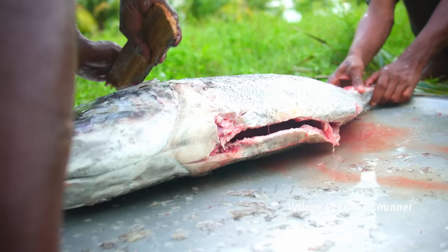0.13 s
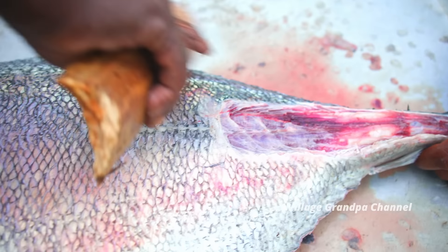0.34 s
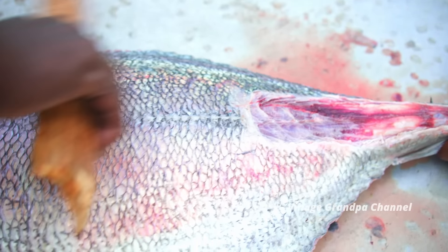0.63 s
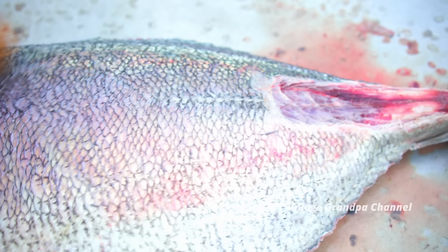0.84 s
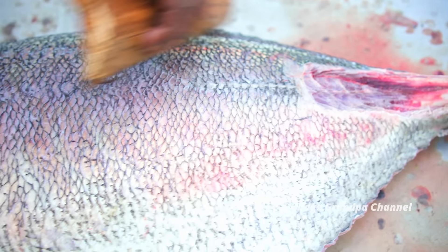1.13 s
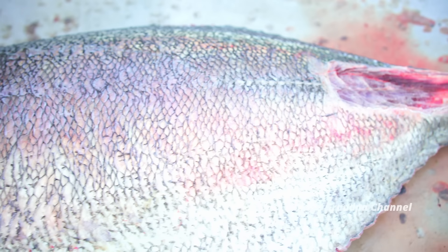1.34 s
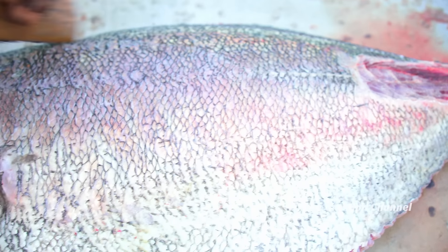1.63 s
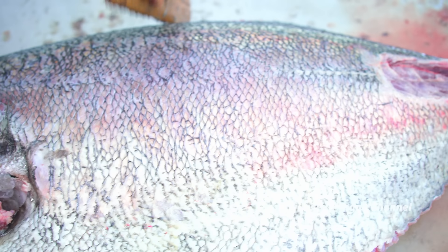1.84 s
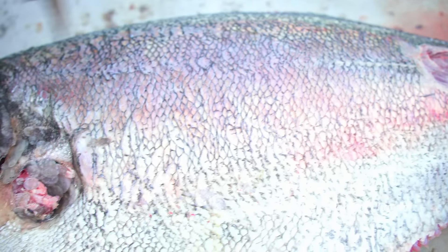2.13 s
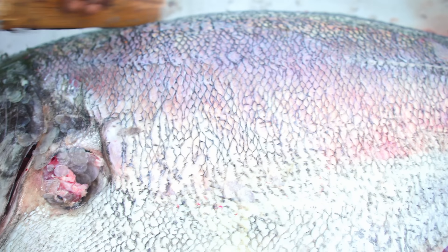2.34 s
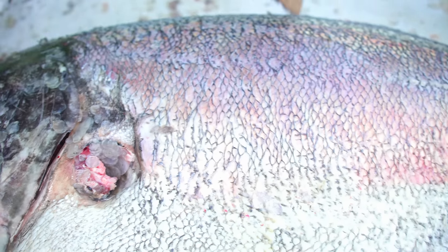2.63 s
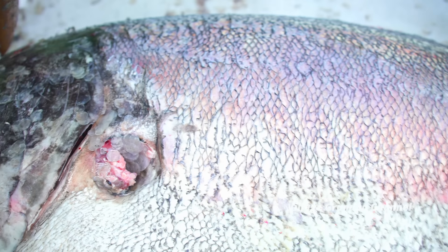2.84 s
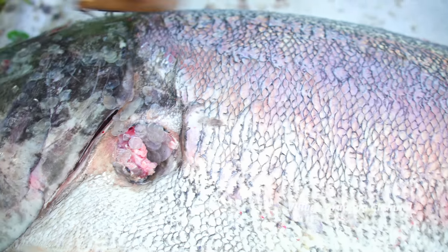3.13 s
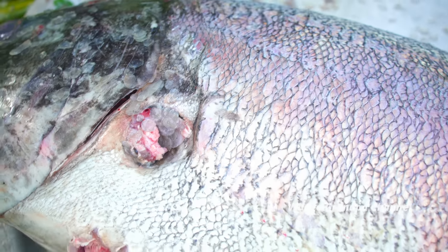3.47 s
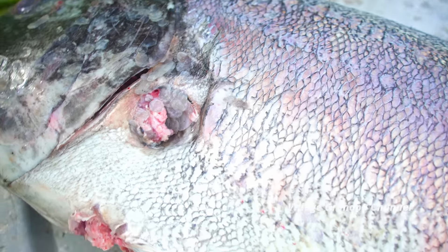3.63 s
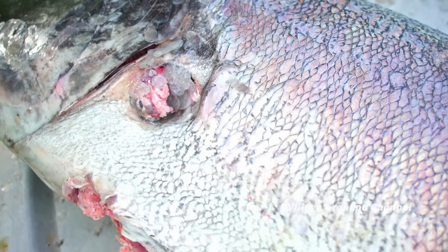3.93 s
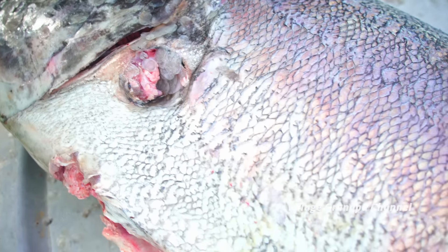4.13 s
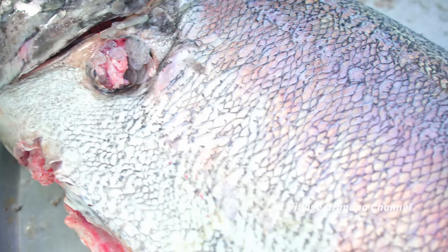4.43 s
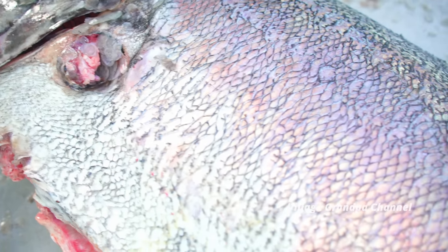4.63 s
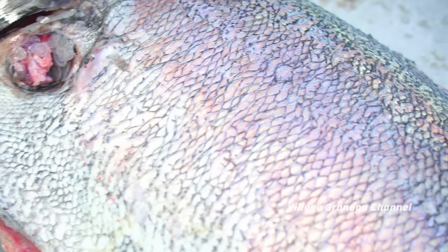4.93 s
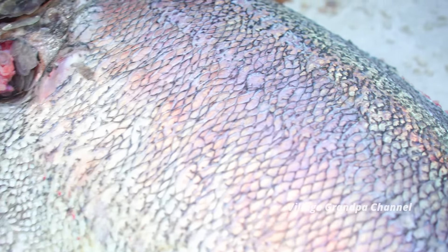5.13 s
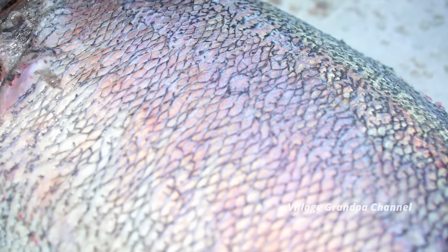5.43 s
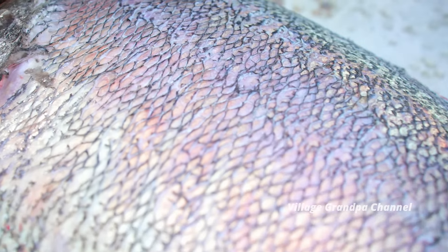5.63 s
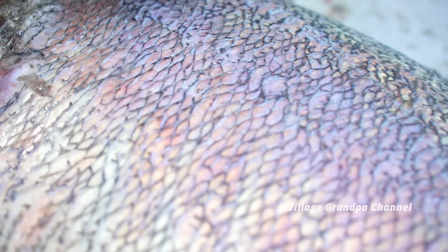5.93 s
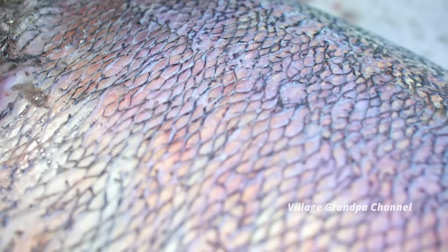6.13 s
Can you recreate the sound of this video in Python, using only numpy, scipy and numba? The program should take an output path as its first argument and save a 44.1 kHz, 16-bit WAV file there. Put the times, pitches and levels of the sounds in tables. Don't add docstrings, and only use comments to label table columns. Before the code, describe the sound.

Quick dry scrapes on a scaly fish lying on sheet metal: each is a short burst of crackle and hiss with hard snaps, a hollow fleshy knock and a slight low table hum. The opening strokes are strongest and longest, later ones shorter and lighter at a regular pace. Close, dry microphone in open air, with quiet leaves, a barely audible insect and soft wind rumble.

```python
import sys
import numpy as np
from scipy import signal
from scipy.fft import rfft, irfft
from scipy.io import wavfile
from scipy.ndimage import uniform_filter1d
from numba import njit

SR = 44100
rng = np.random.default_rng(int(sys.argv[2]) if len(sys.argv) > 2 else 0)


def wav_record(signal):
    frames = np.transpose(np.atleast_2d(signal))
    bounded = np.clip(frames, -1, 1)
    quanta = np.round(bounded * 32767).astype(np.int16)
    wavfile.write(sys.argv[1], SR, quanta)


def to_linear_factor(level_db):
    exponent = np.asarray(level_db, float) / 20
    return 10 ** exponent


N = 277609

# touch, hardest push and lift in seconds, hardest rubbing in dB, rubbing at touch in dB.
STROKES = [(0.042, 0.12, 0.192, -13.5, -15.5), (0.326, 0.38, 0.41, -25, -43.5),
           (0.44, 0.514, 0.58, -16.5, -23.5), (0.629, 0.683, 0.73, -28, -38.5),
           (0.761, 0.855, 0.93, -16, -26.5), (1.163, 1.217, 1.337, -14, -30),
           (1.575, 1.641, 1.707, -20, -40), (1.959, 1.971, 2.09, -26, -32.5),
           (2.144, 2.166, 2.178, -47.5, -53), (2.341, 2.406, 2.438, -27.5, -30.5),
           (2.734, 2.76, 2.835, -29.5, -28.5), (3.112, 3.152, 3.2, -23.5, -33.5),
           (3.46, 3.505, 3.558, -19.5, -34), (3.808, 3.859, 3.926, -21.5, -40),
           (4.192, 4.213, 4.231, -26, -32), (4.523, 4.544, 4.606, -20.5, -32.5),
           (4.87, 4.89, 4.95, -21, -40), (5.205, 5.236, 5.32, -26, -34), (5.587, 5.624, 5.69, -25, -29.5),
           (5.911, 5.981, 6.016, -19, -34), (6.281, 6.293, 6, -33.5, -42)]
# dull over bright body in dB, rubbing at lift over touch in dB,
# then flesh, scale treble and table ring above the rubbing, all in dB.
GRIPS = [(-2, -13, -5.5, -6, -13), (-2.5, -1.5, -6.5, 1, -26), (2.5, -7.5, -11.5, -11, -22.5),
         (-4.5, -6, -9.5, -5.5, -14), (3.5, -4, -6, -8.5, -13), (-1.5, -3, -13.5, -8, -23),
         (-6, -3.5, -9.5, -4, -18.5), (-4, -7.5, -9, -4, -14), (-12, -1, -7.5, -5, -7),
         (-5, -1.5, -7.5, -2.5, -14), (-2.5, -3, -8, -0.5, -17.5), (-7.5, 2, -13.5, -6.5, -13.5),
         (-7, -1.5, -15.5, -4, -13), (-7.5, -1, -12, -4, -10.5), (-4.5, -1, -10, -3, -24),
         (-10, -5, -14.5, -5.5, -34), (-4.5, 3.5, -13.5, -9, -16), (-3.5, -4.5, -8, -5, -16),
         (0.5, -1, -6.5, -5.5, -15.5), (1, 9, -7.5, -10, -26), (3.5, -1, -1.5, -11, -3)]
# time in seconds, level in dB, pitch in Hz.
PLUCKS = [(0.0542, -1.5, 2630), (0.0657, 0, 2570), (0.0856, 0, 3020), (0.101, -1, 1590), (0.105, -2, 3170),
          (0.1129, 0, 3270), (0.13, -2, 1320), (0.143, -4, 1340), (0.4788, -8, 1730), (0.5164, -4, 1870),
          (0.5297, -7.5, 1570), (0.778, -7, 1740), (0.8306, -6, 1680), (0.8586, -5, 1700),
          (0.8844, -9.5, 1520), (1.2165, -2, 1700), (1.5994, -13.5, 1800), (1.6272, -12, 1870),
          (1.6534, -11, 1940), (2.4022, -13.5, 2930), (2.4192, -10.5, 3460), (2.7473, -9, 2960),
          (2.7628, -5.5, 3220), (2.7628, -1.5, 2620), (2.7926, -9, 1860), (2.8198, -15, 2560),
          (3.4944, -5, 3630), (3.505, -11.5, 2590), (3.8433, -10.5, 3040), (3.894, -9.5, 2820),
          (4.554, -7, 2600), (4.5754, -9, 1590), (4.9097, -9, 2800), (4.9352, -15, 2690),
          (5.2356, -11.5, 1660), (5.9521, -7.5, 1387), (5.9736, -7, 1740)]


def unit(x):
    return x / np.sqrt(np.mean(x ** 2))


def walk(rate):
    hold = int(SR / rate)
    steps = np.repeat(rng.standard_normal(N // hold + 1), hold)
    return 0.85 * uniform_filter1d(steps, hold)[:N]


def ring(x, modes):
    out, power = 0, 0
    for k, (hz, width, db) in enumerate(modes):
        b, a = signal.iirpeak(hz, hz / width, SR)
        out = out + (-1) ** k * to_linear_factor(db) * signal.lfilter(b, a, x)
        power += to_linear_factor(2 * db) * np.pi * width / SR
    return out / np.sqrt(power)


@njit
def glide(x, hz, width):
    y, band, low = np.empty(len(x)), 0., 0.
    for i in range(len(x)):
        g = np.tan(np.pi * hz[i] / SR)
        k = width / hz[i]
        v = (band + g * (x[i] - low)) / (1 + g * (g + k))
        band = 2 * v - band
        low = low + 2 * g * v
        y[i] = k * v
    return y


def sliding(x, modes, shift, patchy_db=2.5):
    out, power = 0, 0
    for k, (hz, width, db) in enumerate(modes):
        gain = (-1) ** k * to_linear_factor(db + patchy_db * walk(70))
        out = out + gain * glide(x + 1e-18, hz * shift, 1. * width)
        power += to_linear_factor(2 * db) * np.pi * width / SR
    return out / np.sqrt(power)


def pings(rows, gain_db, ms, rise_ms):
    out, t = np.zeros(N + 4000), np.arange(4000) / SR
    form = (1 - np.exp(-1000 * t / rise_ms)) * np.exp(-1000 * t / ms)
    form = form / form.max()
    for s, db, hz in rows:
        out[int(s * SR):][:4000] += to_linear_factor(db + gain_db) * form * np.sin(2 * np.pi * hz * t)
    return out[:N]


def crackle(rate, spread_db, hiss):
    happens = rng.random(N) < rate / SR
    size = to_linear_factor(spread_db * np.minimum(rng.exponential(size=N), 4))
    sign = np.where(rng.random(N) < .5, -1, 1)
    return unit(unit(happens * size * sign) + hiss * rng.standard_normal(N))


def scraping():
    # time in seconds, flesh pitch in Hz, block pitch in Hz.
    contact = [
        [(0.045, 1050, 1410), (0.117, 1074, 1630), (0.185, 1080, 1500)],
        [(0.33, 656, 1830), (0.374, 670, 2100), (0.41, 747, 1810)],
        [(0.44, 1080, 1730), (0.526, 1010, 1700), (0.58, 748, 1740)],
        [(0.625, 813, 1810), (0.663, 911, 1900), (0.72, 890, 2010)],
        [(0.76, 1120, 1710), (0.906, 820, 1730), (0.94, 844, 1765)],
        [(1.165, 940, 1740), (1.223, 892, 1703), (1.33, 993, 1990)],
        [(1.55, 810, 1780), (1.66, 907, 1740), (1.7, 870, 1860)],
        [(1.94, 779, 1910), (2.042, 913, 1600), (2.09, 865, 2050)],
        [(2.34, 850, 1850), (2.39, 850, 1610), (2.46, 850, 1980)],
        [(2.72, 670, 2010), (2.812, 770, 1760), (2.845, 734, 2060)],
        [(3.11, 826, 1890), (3.148, 1020, 1910), (3.2, 944, 1850)],
        [(3.455, 665, 2000), (3.505, 702, 1924), (3.555, 727, 2006)],
        [(3.805, 665, 1810), (3.895, 705, 1780), (3.92, 709, 1830)],
        [(4.17, 860, 1730), (4.234, 760, 1680), (4.28, 885, 1850)],
        [(4.52, 689, 1886), (4.562, 672, 1820), (4.6, 780, 1700)],
        [(4.87, 684, 1745), (4.928, 677, 1780), (4.99, 763, 1860)],
        [(5.2, 970, 1820), (5.254, 816, 1570), (5.325, 635, 1870)],
        [(5.58, 765, 1770), (5.656, 930, 1780), (5.69, 902, 1783)],
        [(5.92, 990, 1685), (5.992, 1041, 1591), (6.06, 844, 1650)],
    ]
    t = np.arange(N) / SR
    starts = [row[0] - .07 for row in STROKES]
    stroke = np.clip(np.searchsorted(starts, t) - 1, 0, None)
    dull_db, _, flesh_db, treble_db, table_db = np.transpose(GRIPS)[:, stroke]
    place = np.vstack(contact).T
    flesh_hz = np.interp(t, place[0], place[1])
    block_hz = np.interp(t, place[0], place[2])

    (body_slips, treble_slips), (body_kicks, treble_kicks) = slipping()
    rub = rubbing() * to_linear_factor(2.0 * walk(230) + 2.0)
    effort = rub + body_slips
    grit = crackle(rate=1800, spread_db=4.0, hiss=.6)
    weight = signal.lfilter([.003], [1, -.997], effort)

    body = block_and_coat(grit, effort, body_kicks, dull_db, block_hz)
    treble = scale_treble(rub * to_linear_factor(treble_db) + to_linear_factor(3.5) * treble_slips, treble_kicks)
    flesh = fish_flesh(grit, effort, body_kicks, flesh_db, flesh_hz)
    tones = plucks_and_thuds()
    return body + treble - flesh + tones + metal_table(weight, body_kicks, table_db) + fish_rocking(weight)


def rubbing():
    # touch and lift in seconds, rubbing in dB.
    drags = [(.001, 0.042, -40), (0.188, 0.295, -34), (0.311, 0.33, -51), (0.592, 0.624, -55),
             (0.717, 0.748, -52), (0.934, 0.948, -42), (1.156, 1.122, -44), (1.702, 1.715, -48.5),
             (1.92, 1.95, -46), (2.092, 2.106, -55), (2.314, 2.374, -57.5), (2.435, 2.473, -42.5),
             (2.687, 2.703, -46.5), (2.713, 2.735, -53), (2.831, 2.856, -34.5), (1.556, 1.608, -55),
             (2.914, 2.943, -55.5), (3.934, 3.949, -40), (4.138, 4.141, -56), (4.154, 4.194, -45.5),
             (4.23, 4.285, -52), (4.272, 4.289, -38), (4.957, 4.972, -54), (4.97, 4.993, -42.5),
             (5.325, 5.346, -56), (5.361, 5.397, -59), (5.557, 5.577, -38.5), (5.701, 5.706, -57),
             (6.016, 6.027, -44.5), (6.032, 6.06, -31)]
    # time in seconds,
    # rubbing lost in dB, half length in ms.
    skips = [(5.577, 25, 4.2), (4.587, 16.5, 2.6), (.303, 30, 5), (.79, 1, 3.6), (2.78, 16, 2.8),
             (2.734, 11.5, 2), (1.584, 13.5, 3.1), (1.595, 15, 2.2), (1.613, 14, 2.9), (1.989, 24, 4.6),
             (2.01, 13, 2.3), (2.377, 17.5, 3.8), (2.388, 12, 3.4), (2.37, 12.5, 2.2), (2.744, 20, 3.8),
             (2.789, 10.5, 1.4), (3.121, 14, 3.1), (3.19, 14, 3), (3.468, 15, 3), (3.477, 9, 1.6),
             (3.502, 8, 1.3), (3.515, 6.5, 1.5), (3.536, 10.5, 2.5), (3.822, 16, 3.5), (3.877, 14, 4.4),
             (3.907, 21, 5.1), (3.929, 19, 3), (4.213, 8, 2.5), (4.567, 22, 4), (4.896, 21, 2.7),
             (4.926, 14, 3.1), (5.254, 14, 4.3), (5.609, 7, 3.85), (6.062, 18.5, 4)]
    touch_slope, lift_slope = 4500, 3500
    t = np.arange(N) / SR
    pushes = [(a, top, b, db, touch, touch + grip[1])
              for (a, top, b, db, touch), grip in zip(STROKES, GRIPS)]
    pushes += [(a, (a + b) / 2, b, db + 2, db - 4.5, db - 4.0) for a, b, db in drags]
    gain = 0
    for a, top, b, db, touch, lift in pushes:
        times = [a - 1, a, top, b, b + 1]
        levels = [touch - touch_slope, touch, db, lift, lift - lift_slope]
        gain = gain + to_linear_factor(np.interp(t, times, levels))
    lost_db = sum(db * np.exp(-((1000 * (t - s) / ms) ** 2) ** 1.6) for s, db, ms in skips)
    return to_linear_factor(-lost_db) * gain


def slipping():
    # time in seconds, level in dB, treble above level in dB, length in ms.
    slips = [(0.8089, -20, -24.5, 6.1), (0.8634, -14, -19, 2.5), (2.352, -17.5, -5, 6.2),
             (1.21, -17.5, -19, 10.97), (1.2346, -20, -1.5, 9), (1.569, -18, -3, 5.1),
             (1.625, -17.5, -4, 6.6), (1.9753, -20.5, -17.5, 4), (1.995, -19.5, -0.5, 9.4),
             (2.018, -30, 0, 13), (2.3467, -15, -2.5, 4.7), (2.361, -16.5, -6, 3.4),
             (2.7242, -20, -8.5, 5.5), (2.7353, -16, -15, 3.1), (2.758, -19, -6, 10.3),
             (2.793, -22.5, -15, 7.6), (2.804, -22.5, -2, 16.8), (3.178, -24, -3.5, 7),
             (3.194, -25, -2, 6.9), (3.457, -21.5, -6.5, 4.5), (3.54, -30, 2, 6.7),
             (3.837, -19.5, -5.5, 9.8), (3.8845, -22.5, -2, 9.7), (4.1996, -27, 8, 10.8),
             (4.5492, -18.5, -1, 5.9), (4.575, -18.5, -9, 7.2), (4.9342, -21, -4.5, 10.4),
             (5.258, -18.5, -24, 5.1), (5.2867, -26.5, -3.5, 13.5), (5.9944, -19, -7, 7.8),
             (6.0315, -21.5, -7.5, 3.8)]
    # time in seconds, level in dB, length in ms.
    brushes = [(0.9742, -45, 3.5), (0.985, -44.5, 8.4), (1.323, -44, 3.5), (1.334, -30.5, 5.6),
               (1.548, -28.5, 4.9), (1.7622, -50, 8.9), (1.886, -44, 11), (1.942, -38, 13),
               (2.0426, -30.5, 8.9), (2.2815, -44, 11.3), (2.6899, -29, 7.9), (2.9335, -55, 8.7),
               (3.1054, -39, 12), (3.2434, -52, 11), (3.4392, -36.5, 3.7), (3.7913, -45, 5.8),
               (3.8055, -28, 6.4), (4.0923, -41, 5.7), (4.103, -40, 9), (4.269, -24.5, 9.4),
               (4.3526, -46, 11.7), (4.4971, -35.5, 7.3), (4.592, -29, 5.1), (4.971, -24.5, 11),
               (5.154, -43.5, 13), (5.582, -21.5, 7.2), (6.21, -58, 4.3), (6.247, -57, 6.7)]
    # time in seconds, level in dB, treble above level in dB.
    snaps = [(0.0449, -16.5, -15), (0.0709, -10, -19), (0.1606, -12.5, 6.5), (0.4645, -11.5, -4.5),
             (0.5034, -12.5, -27.5), (0.7951, -12.5, -5), (1.1846, -9, -24), (1.5764, -11.5, -4.5),
             (1.9671, -12.5, -5.5), (2.3381, -23, -8.5), (2.3601, -18, -19), (2.3717, -12.5, 1.5),
             (2.3823, -9.5, -8), (2.7368, -13.5, -14), (2.7539, -14, -6.5), (2.7844, -14, -2),
             (3.1479, -17, -3.5), (3.4572, -12.5, -8), (3.4877, -12, 0), (3.5222, -19, -1.5),
             (3.8292, -13.5, -3), (3.8586, -13, -5), (4.219, -19.5, 5), (4.542, -13.5, -3),
             (4.8907, -14, -2.5), (5.2186, -15, -21), (5.2654, -18.5, 0.5), (5.2892, -23, -15.5),
             (5.5824, -18, -7), (5.603, -11, -20),
             (0.426, -34.5, -1), (0.4435, -23, -3), (0.6233, -32, -3), (.6384, -34.5, -4.5),
             (1.163, -24.5, -29), (1.3376, -33, 3), (1.5498, -29, -10), (1.5896, -20, 0.5),
             (1.6086, -25, -2), (1.9429, -21, -26), (2.1155, -56, 9), (2.2136, -49.5, -6),
             (2.7742, -23, 8.5), (5.694, -45.5, 8), (2.268, -51.5, -7), (2.4584, -36.5, 11.5),
             (2.5195, -47.5, 5), (2.6901, -27, -6.5), (2.8437, -29, 5.5), (3.105, -32.5, 1.5),
             (3.2518, -42.5, 4), (3.2906, -49.5, -2), (3.439, -30.5, 4), (3.793, -39, -6), (3.933, -31, 1),
             (4.1101, -34, 0.5), (4.142, -44, -3), (4.5223, -20.5, -4), (4.86, -35, -9), (5.202, -35, -15),
             (5.3973, -48, 4.5), (5.9227, -29.5, 9.5), (6.0461, -25.5, 0)]
    # time in seconds, level in dB.
    flakes = [(0.2302, -40), (.357, -23.5), (1.3585, -44.5), (2.318, -48), (2.489, -56), (2.3292, -40.5),
              (3.912, -36), (4.122, -52), (3.2267, -45), (3.9231, -29), (4.1592, -46), (4.172, -41),
              (4.247, -33), (4.5532, -17), (4.8762, -36), (4.902, -25), (4.917, -30.5), (4.982, -30.5),
              (5.1925, -38), (5.363, -53), (5.417, -51.5), (5.484, -52), (5.619, -19), (5.6322, -22),
              (5.6647, -22.5), (6.056, -25.5), (6.0704, -30)]
    env, kicks = np.zeros((2, N + 2000)), np.zeros((2, N))
    t_ms = 1000 * np.arange(2000) / SR

    for s, db, treble_db, ms in slips + [(s, db, -8, ms) for s, db, ms in brushes]:
        form = (1 - np.exp(-t_ms / (0.23 * ms))) * np.exp(-(t_ms / ms) ** 2.1)
        env[:, int(s * SR):][:, :2000] += to_linear_factor(np.array([[db], [db + treble_db]])) * form

    pluck_clicks = [(s, db - 12, -9) for s, db, _ in PLUCKS]
    flicks = [(s, db, -2) for s, db in flakes]
    snap_form = 0.39 * np.exp(-t_ms / 0.28) + to_linear_factor(-16) * np.exp(-t_ms / 4.5)
    for s, db, treble_db in snaps + pluck_clicks + flicks:
        size = to_linear_factor(np.array([[db], [db + treble_db]]))
        env[:, int(s * SR):][:, :2000] += size * snap_form
        kicks[:, int(s * SR)] += 9.33 * size[:, 0]
    return env[:, :N], kicks


def block_and_coat(grit, effort, kicks, dull_db, block_hz):
    # pitch in Hz, width in Hz, level in dB.
    dull = [(1340, 404, -3.5), (1721, 400, 0)]
    # pitch in Hz, width in Hz, level in dB.
    bright = [(1960, 130, -3), (2600, 810, -1), (3660, 1114, -4), (4580, 250, -9.5)]
    share = 1 / (1 + to_linear_factor(-2 * dull_db))
    trade = to_linear_factor(1.4 * walk(60))
    block_push = (np.roll(grit, N // 2) * effort - kicks) * np.sqrt(share) * trade
    coat_push = (grit * effort + kicks) * np.sqrt(1 - share) / trade
    block = sliding(block_push, dull, block_hz / 1700)
    return block + sliding(coat_push, bright, 1 + 0.013 * walk(40))


def scale_treble(rasp, kicks):
    # pitch in Hz, width in Hz, level in dB.
    treble = [(5030, 1500, -0.5), (6000, 1500, -0.5), (8400, 1700, 1.5), (13450, 1400, -6),
              (14200, 3000, -15)]
    sharp = crackle(rate=1200, spread_db=5.5, hiss=0.73)
    fizz = ring(kicks, treble)
    for k, mode in enumerate(treble):
        _, width, db = mode
        push = np.roll(sharp, k * SR) * rasp
        fizz = fizz + ring(push * to_linear_factor(db - 39.5) * np.sqrt(width), [mode])
    return fizz + to_linear_factor(-12) * np.diff(kicks, prepend=0)


def fish_flesh(grit, effort, kicks, flesh_db, flesh_hz):
    push = np.roll(grit, N // 3) * effort + 0.7 * kicks
    push = push * to_linear_factor(flesh_db - 2.5 + 0.82 * walk(40))
    main = sliding(push, [(0.99, 380, 0)], flesh_hz)
    lower = sliding(push, [(.55, 259.3, 0)], flesh_hz)
    return main - to_linear_factor(-10.0) * lower


def plucks_and_thuds():
    # time in seconds, level in dB, pitch in Hz.
    thuds = [(0.446, -28, 960), (0.765, -24.5, 1010), (0.813, -23, 950), (0.866, -12.5, 950),
             (1.168, -32.5, 940), (1.184, -20, 886), (1.228, -20, 764), (1.552, -26, 795),
             (1.576, -21, 775), (1.622, -19.5, 817), (1.96, -23, 794), (2.342, -39, 840), (2.381, -28, 817),
             (2.725, -26, 756), (2.736, -21.5, 635), (2.783, -19.5, 640), (3.487, -32, 690),
             (3.829, -22.5, 624), (4.206, -23, 620), (4.269, -35, 1000), (4.527, -35, 716),
             (4.534, -26.5, 715), (4.877, -33, 627), (5.261, -22, 673), (5.554, -39, 760),
             (5.583, -30, 704)]
    # seconds, dB, Hz
    single_tones = [(.8405, -7.5, 1660), (.803, -12, 1750), (2.16, -39, 1800), (4.5, -40.5, 4200)]
    plucked = pings(PLUCKS, -5.5, ms=1.9, rise_ms=0.1)
    thudding = pings(thuds, -1.5, ms=5, rise_ms=0.32)
    return plucked + thudding + pings(single_tones, 0, ms=4.1, rise_ms=1.5)


def metal_table(weight, kicks, table_db):
    # pitch in Hz, width in Hz, level in dB.
    sheet = [(210, 110, -4.5), (312, 46, 8), (385, 78, -13.5)]
    # time in seconds, level in dB, pitch in Hz.
    knocks = [(0.099, -19, 370), (0.155, -17, 343), (0.174, -15, 309), (0.215, -29.5, 369),
              (0.486, -28.5, 367), (0.845, -24, 347), (0.905, -31.5, 310), (2.696, -40, 323.5),
              (3.44, -37.5, 313), (3.492, -30.5, 307), (3.514, -25.5, 298.4), (3.855, -38, 313),
              (4.224, -28, 312), (4.565, -28.5, 309), (4.9, -32.5, 294), (5.611, -32.5, 299)]
    pressing = rng.standard_normal(N) * weight * to_linear_factor(table_db - 5.5)
    hum = ring(pressing + 0.52 * kicks * to_linear_factor(table_db), sheet)
    return hum + pings(knocks, -1.5, ms=17, rise_ms=2.9)


def fish_rocking(weight):
    # pitch in Hz, width in Hz, level in dB.
    thump = [(45.86, 11, -1.5), (153, 95, -1)]
    # time in seconds, level in dB, half length in ms.
    bumps = [
        (.27, -43, 25),
        (2.0, -46.5, 51),
        (5.26, -40, 32),
        (6.008, -36, 6.6),
        (5.97, -47, 55),
    ]
    t = np.arange(N) / SR
    rocking = weight * to_linear_factor(-28.5 + 2.5 * t)
    for s, db, ms in bumps:
        rocking = rocking + to_linear_factor(db) * np.exp(-(1000 * (t - s) / ms) ** 2)
    return ring(rng.standard_normal(N) * rocking, thump)


def ground(x):
    t = np.arange(8000) / SR
    fade = np.exp(-np.log(1000) * t / 0.027) + to_linear_factor(-30) * np.exp(-np.log(1000) * t / .16)
    tail = signal.lfilter([.4], [1, -.6], rng.standard_normal(len(t)) * fade)
    return to_linear_factor(-33.5) * signal.fftconvolve(x, tail)[:N]


def leaves():
    # frequency in Hz, level in dB per Hz.
    air = [(30, -7.5), (60, -6.5), (150, -9.5), (650, -20.5), (5000, -30.5), (9500, -33), (12000, -42),
           (16000, -62.5)]
    # time in seconds, level in dB.
    air_level = [
        (0, -47),
        (1.1, -57),
        (1.5, -58.5),
        (3.4, -59),
        (4.8, -62),
        (6.29, -61.5),
    ]
    t, hz = np.arange(N) / SR, np.fft.rfftfreq(N, 1 / SR)
    air_hz, air_db = np.transpose(air)
    colour = to_linear_factor(np.interp(np.log(hz + 1), np.log(air_hz), air_db, left=-40))
    rustle = unit(irfft(rfft(rng.standard_normal(N)) * colour, N))
    return rustle * to_linear_factor(np.interp(t, *np.transpose(air_level)) + 0.84 * walk(5.0))


def insect():
    # start in seconds, end in seconds, level in dB.
    calls = [
        (3.54, 3.805, -77.5),
        (5.023, 5.181, -74.5),
    ]
    t = np.arange(N) / SR
    buzz = ring(rng.standard_normal(N), [(12400, 1200, 0)])
    buzz = unit(ring(buzz, [(12570, 1200, 0)]))
    return buzz * sum(to_linear_factor(db) * np.sin(np.pi * np.clip((t - a) / (b - a), 0, 1)) for a, b, db in calls)


def wind():
    # time in seconds, level in dB.
    gusts = [
        (0.0, -25.5),
        (0.35, -47.5),
        (1.2, -51),
        (2.45, -55),
        (2.95, -38.5),
        (3.15, -47),
        (4.3, -47),
        (5.75, -54),
        (6.29, -42.5),
    ]
    slow = signal.butter(2, [4, 14], "bandpass", fs=SR, output="sos")
    puff = unit(signal.sosfilt(slow, rng.standard_normal(N)))
    return puff * to_linear_factor(np.interp(np.arange(N) / SR, *np.transpose(gusts)))


def scene():
    near = scraping()
    return (near + ground(near) + leaves() + insect() + wind())[None]


def top_cut(x):
    return signal.sosfilt(signal.butter(12, 16480, fs=SR, output="sos"), x)


def record(dry):
    heard = dry - .5 * signal.lfilter(*signal.iirpeak(10700, 6.0, SR), dry)
    top_edge = signal.ellip(6, .3, 34, 15800, fs=SR, output="sos")
    heard = signal.sosfilt(top_edge, heard)
    return top_cut(np.clip(heard, -1, 1))


dry = scene()
out = record(dry)
wav_record(out)
```